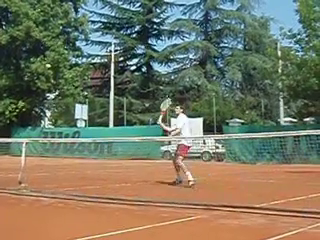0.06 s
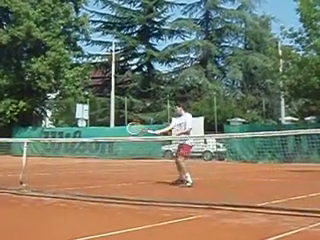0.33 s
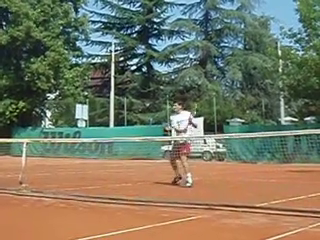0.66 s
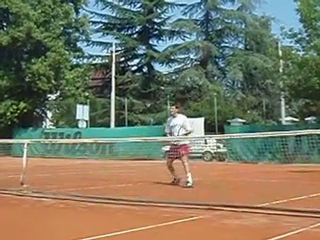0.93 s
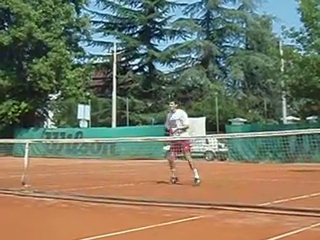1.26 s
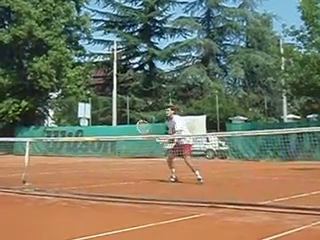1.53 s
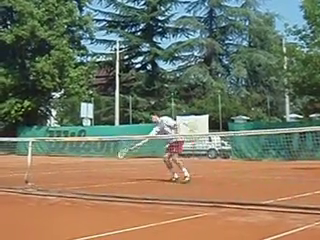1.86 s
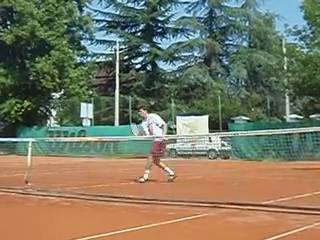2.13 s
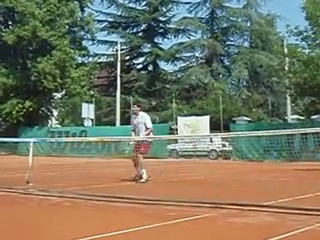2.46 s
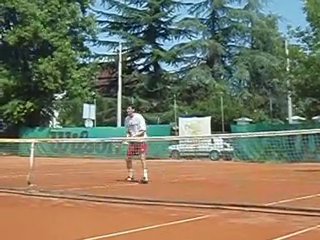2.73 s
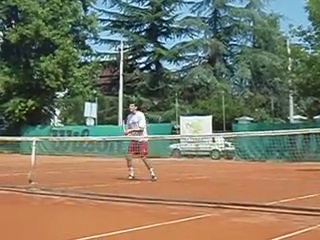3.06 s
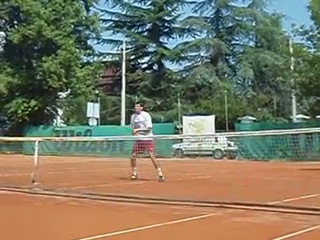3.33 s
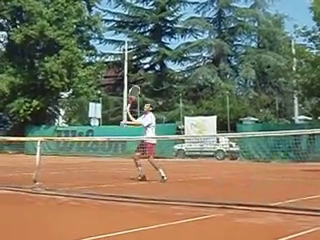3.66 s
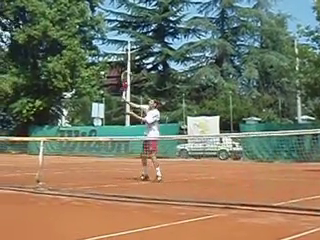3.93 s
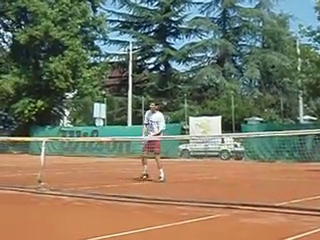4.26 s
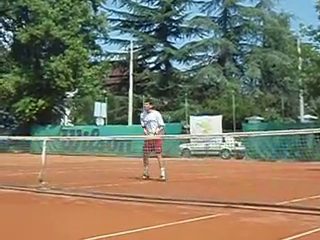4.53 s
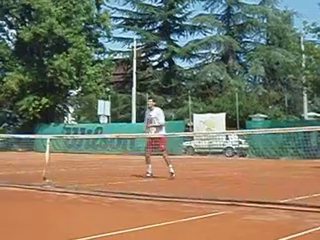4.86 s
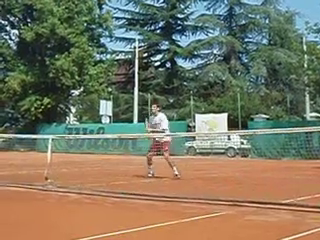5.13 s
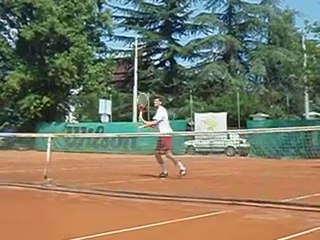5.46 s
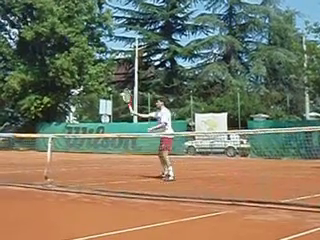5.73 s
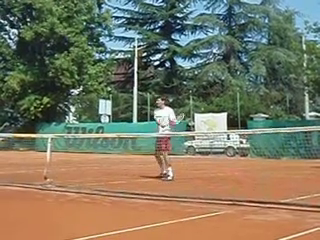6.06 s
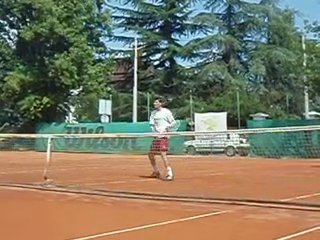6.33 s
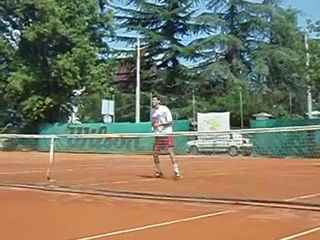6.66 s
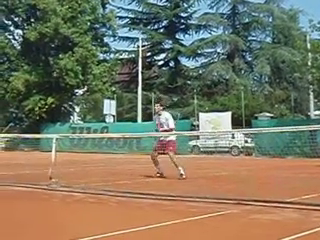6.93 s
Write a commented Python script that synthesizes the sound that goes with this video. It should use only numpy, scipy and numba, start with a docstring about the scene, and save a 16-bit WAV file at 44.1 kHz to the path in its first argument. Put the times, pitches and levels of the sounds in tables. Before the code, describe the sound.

A tennis rally on an outdoor clay court. A hard volley cracks and briefly overloads the small microphone, then racket hits follow roughly once a second, some sharp, some softer with a short ring of strings. The ball pats the clay twice and shoes scuff on grit between strokes. A second distorted volley comes near the end, followed by one soft return. Faint hiss and open-air rumble lie underneath.

```python
"""Outdoor clay tennis court: one player volleys near the net, a partner returns from far off.
The ball bounces, shoes scuff and slide on grit, fence and trees answer faintly.
A small camera listens: its microphone peaks near 3.5 kHz and the two hardest volleys overload it.
Its gain control ducks after loud hits, so the court sinks under the hiss and creeps back over seconds."""
import sys
import numpy as np
from scipy.fft import rfft, irfft, next_fast_len
from scipy.io import wavfile
from scipy.ndimage import map_coordinates
from numba import njit

SR = 44100
rng = np.random.default_rng(int(sys.argv[2]) if len(sys.argv) > 2 else 0)


def output_pcm(signal):
    """Save a mono or channel-first signal as 16-bit PCM at the path in sys.argv[1].

    Samples are clipped to [-1, 1] before scaling.
    """
    pcm = np.clip(np.atleast_2d(signal).T, -1, 1) * 32767
    wavfile.write(sys.argv[1], SR, np.round(pcm).astype(np.int16))


N = 309141

# microphone response: (frequency [Hz], gain [dB])
MIC_RESPONSE = [(20, -6), (2900, 0.5), (3200, 3.5), (3470, 9), (3680, 6), (3900, -4), (4250, -10.5),
                (4450, -18.5), (4650, -47.5), (5000, -66.5)]
LEAD_S = .015  # silence before each contact
AGE_S = np.arange(SR // 2) / SR - LEAD_S  # time since contact


def rackets(string_hz=1890, string_t60_s=0.18):
    """The ball slaps the strings, rubs across them and leaves; the strings ring on."""
    # (time [s], thud [dB], pock [dB], clack [dB], crack [dB], strings [dB], contact [s], scatter [dB])
    strokes = [(1.1935, -22.5, -20, -17, -33, -54, 0.0014, -4),
               (1.8747, -27.5, -21, -40.5, -8.5, -52, 0.0043, -9.5),
               (3.165, -29, -26, -30.5, -29.5, -35, 0.0048, -4),
               (3.9387, -31.5, -22.5, -19.5, -10.5, -51.5, 0.002105, -3.5),
               (4.8818, -33.5, -35.5, -25, -25, -30, .003, -3),
               (6.662, -39, -33.5, -48, -68, -31.5, 0.00345, -5)]
    track, t = np.zeros(N), np.maximum(AGE_S, 0)
    strings = np.sin(2 * np.pi * string_hz * t) * amp(-60 * t / string_t60_s)
    strings = unit_blow(filtered(strings, lambda f: gain(MIC_RESPONSE, f)))
    for time_s, *levels_db, strings_db, contact_s, scatter_db in strokes:
        push = tick(0) - tick(contact_s) + 1.9 * burst(0, t60_s=0.011, rise_s=0.00069)
        add(track, time_s - LEAD_S, impact(push, levels_db, scatter_db) + amp(strings_db) * strings)
    return track


def overloads(ring_s=0.00066, edge_s=.00015, stuck_db=2.5, rail=.705):
    """A hard volley rings the microphone; the amplifier sticks at its rail, then swings back."""
    # (time [s], polarity [+/-1], stuck for [s], ring [dB], ring [Hz])
    hard_volleys = [(.29986, -1, .00319, -2, 3400), (5.77109, 1, .00361, -5.5, 3100)]
    ring, stuck = np.zeros(N), np.zeros(N)
    for time_s, polarity, hold_s, ring_db, ring_hz in hard_volleys:
        t = np.arange(N) / SR - time_s
        envelope = np.exp(-((t + 0.00013) / ring_s) ** 2)
        ring += polarity * amp(ring_db) * envelope * np.sin(2 * np.pi * ring_hz * t)
        stuck += polarity * (np.clip(t / edge_s, 0, 1) - np.clip((t - hold_s) / edge_s, 0, 1))
    return np.clip(ring + amp(stuck_db) * filtered(stuck, coupling), -rail, rail)


def coupling(f, highpass_hz=137, width_hz=178, lowpass_hz=5000):
    """Amplifier coupling: a high-pass makes the back-swing, a low-pass rounds the edges."""
    highpass = resonance(f, highpass_hz, width_hz) * 1j * f / width_hz
    return highpass / (1 + 1j * f / lowpass_hz)


def bounces():
    """Clay stops the ball with one short pat."""
    # (time [s], thud [dB], pock [dB], clack [dB], crack [dB])
    landings = [(2.652, -55, -46, -38, -42), (4.4702, -46.5, -40, -34.5, -45)]
    track = np.zeros(N)
    for time_s, *levels_db in landings:
        push = tick(0) + 0.69 * burst(0, t60_s=0.012, rise_s=.001)
        add(track, time_s - LEAD_S, impact(push, levels_db, scatter_db=-8.5))
    return track


def impact(push, levels_db, scatter_db):
    """A push rings the ball's resonances; court and fence scatter it, trees return it later."""
    # thud, pock, clack, crack: (centre [Hz], width [Hz])
    ball_modes = [(410, 380), (950, 260), (2400, 1770), (3500, 2080)]
    echoes = burst(0.0045, t60_s=0.12, rise_s=0.0051)
    echoes += amp(-15.5) * burst(.015, t60_s=0.017, rise_s=0.0005)
    echoes += amp(-18) * burst(.15, t60_s=0.36, rise_s=.02)
    sound = 0
    for (hz, width_hz), level_db in zip(ball_modes, levels_db):
        mode = lambda f: resonance(f, hz, width_hz) ** 2 * gain(MIC_RESPONSE, f)
        direct = unit_blow(filtered(push, mode))
        scattered = unit_blow(filtered(echoes, mode))
        scattered_db = scatter_db - 1.4 * np.log2(hz / 2000)  # scatter is duller
        sound += amp(level_db) * (direct + amp(scattered_db) * scattered)
    return sound


def shoes(shuffle_db=-47.5, release_s=0.0095):
    """Soles drag over loose grit; weight adds a duller crunch; the feet never quite rest."""
    # (time [s], length [s], level [dB], relative heel level [dB], bite time [s])
    scuffs = [(0.013, 0.063, -44, -2, 0.013), (0.094, .063, -33, -12, 0.029),
              (2.961, 0.047, -29.5, -28, 0.07), (3.596, 0.026, -43.5, -9.5, .02),
              (3.853, 0.086, -43, -9, 0.047), (3.996, .16, -39, -6, 0.035), (4.713, 0.05, -40, -20, .05),
              (4.994, 0.096, -44, -11, .03), (5.24, 0.06, -45, -6, 0.024), (5.343, .095, -39.5, -5, .06),
              (5.512, 0.075, -44.5, -3.5, 0.048), (5.74, 0.033, -26, -12, 0.018)]
    # spectra of sliding sole, weighted heel, shuffling: (frequency [Hz], gain [dB])
    grit_spectrum = [(200, -20.5), (900, -16.5), (1600, -23.5), (2500, -6), (3300, 4.5), (4500, 0)]
    heel_spectrum = [(100, -1.5), (400, -2.5), (1100, -1), (2000, 5), (2800, 1.5), (4000, -13.5)]
    shuffle_spectrum = [(80, -2), (200, -1.5), (600, -3.5), (1800, -3.5), (3300, -0.5), (4500, -0.5)]
    t = np.arange(N) / SR
    grit = through_mic(crumbs(per_s=3900, spread_db=-1), grit_spectrum)
    heel = through_mic(crumbs(per_s=4000, spread_db=4.5), heel_spectrum)
    shuffle = through_mic(crumbs(per_s=4900, spread_db=3), shuffle_spectrum)
    track = amp(shuffle_db) * drift(per_s=14, swing_db=2) * shuffle
    for time_s, length_s, level_db, heel_db, bite_s in scuffs:
        bite = np.clip((t - time_s) / bite_s + .5, 0, 1)
        release = np.clip((time_s + length_s - t) / release_s + .5, 0, 1)
        track += amp(level_db) * bite * release * (grit + amp(heel_db) * heel)
    return track


def crumbs(per_s, spread_db):
    """Clay crumbs crack at random, a few of them large."""
    cracks = rng.random(N) < per_s / SR
    return unit_rms(cracks * rng.standard_normal(N) * amp(spread_db * rng.standard_normal(N)))


def faint_tone(time_s=3.32, half_width_s=.04, hz=662, sag_per_s=0.41, level_db=-43):
    """A brief, faint tone sags in pitch."""
    t = np.arange(N) / SR - time_s
    envelope = np.exp(-(t / half_width_s) ** 2)
    return amp(level_db) * envelope * np.sin(2 * np.pi * hz * (1 - sag_per_s * t / 2) * t)


def air(level_db=-57):
    """Soft, wavering rumble of open air."""
    # (frequency [Hz], gain [dB])
    rumble_spectrum = [(25, -4.5), (70, -2), (140, 2), (300, -11), (800, -32), (2000, -44.5)]
    rumble = through_mic(rng.standard_normal(N), rumble_spectrum)
    return amp(level_db) * rumble * drift(per_s=3, swing_db=1.2)


def tick(delay_s):
    """One sharp push."""
    return unit_blow(np.exp(-((AGE_S - delay_s) * SR / 2) ** 2))


def burst(delay_s, t60_s, rise_s):
    """Delayed noise that swells and dies away."""
    t = np.maximum(AGE_S - delay_s, 0)
    return unit_blow(rng.standard_normal(len(t)) * amp(-60 * t / t60_s) * (1 - np.exp(-t / rise_s)))


def drift(per_s, swing_db):
    """Smooth random gain."""
    knots = rng.standard_normal(int(N * per_s / SR) + 4)
    return amp(swing_db * map_coordinates(knots, [np.arange(N) * per_s / SR]))


def amp(db):
    return 10 ** (np.asarray(db) / 20)


def unit_rms(x):
    return x / np.sqrt(np.mean(x ** 2) + 1e-20)


def unit_blow(x, blow_s=.01):
    """Scale to the energy of rms 1 held for blow_s."""
    return x / np.sqrt(np.sum(x ** 2) / (blow_s * SR) + 1e-20)


def gain(points, f):
    """Linear gain from (Hz, dB) points on a log axis."""
    hz, db = np.transpose(points)
    return amp(np.interp(np.log(f + 1), np.log(hz + 1), db))


def resonance(f, hz, width_hz):
    """Causal band-pass response."""
    return 1j * f * width_hz / (hz * hz - f * f + 1j * f * width_hz)


def filtered(x, response):
    """Apply a complex frequency response."""
    size = next_fast_len(len(x) + 8192)
    return irfft(rfft(x, size) * response(np.fft.rfftfreq(size, 1 / SR)), size)[:len(x)]


def through_mic(x, spectrum):
    """Source spectrum times microphone response, at rms 1."""
    return unit_rms(filtered(x, lambda f: gain(spectrum, f) * gain(MIC_RESPONSE, f)))


def add(track, time_s, sound):
    start = max(round(time_s * SR), 0)
    track[start:start + len(sound)] += sound[:N - start]


@njit
def gain_control(x, limit, cut_db_per_ms, recover_db_per_s, lag_s):
    """After a lag, gain falls in proportion to the output's excess over the limit, then creeps back."""
    lag = round(lag_s * SR)
    out, duck_db = np.zeros(len(x)), np.zeros(len(x) + lag)
    for i in range(len(x)):
        out[i] = x[i] * 10 ** (-duck_db[i] / 20)
        excess = max(abs(out[i]) - limit, 0.0)
        step_db = (1000 * cut_db_per_ms * excess - recover_db_per_s) / SR
        duck_db[i + lag] = max(duck_db[i + lag - 1] + step_db, 0.0)
    return out


def scene():
    """Rally, footwork, faint tone and air, in mono."""
    return (rackets() + overloads() + bounces() + shoes() + faint_tone() + air())[None]


def record(dry, hiss_db=-52, band_limit_hz=15800):
    """The camera rides its gain, adds hiss, dulls the treble and cuts off at its band limit."""
    # camera hiss and top-end response: (frequency [Hz], gain [dB])
    hiss_spectrum = [(25, 2), (120, 6), (600, 2), (1000, 1), (1350, 0), (1900, .5), (2800, -0.5),
                     (4500, -1)]
    treble_response = [(4000, 0.5), (5200, -5.5), (8000, -1.5), (11000, -12.5), (15000, 2), (16000, -26.5)]
    ducked = gain_control(dry[0], limit=0.17, cut_db_per_ms=22, recover_db_per_s=7.5, lag_s=.009)
    hiss = amp(hiss_db) * through_mic(rng.standard_normal(N), hiss_spectrum)
    top_end = lambda f: gain(treble_response, f) / (1 + (f / band_limit_hz) ** 60)
    return filtered(ducked + hiss, top_end)[None]


dry = scene()
out = record(dry)
output_pcm(out)
```